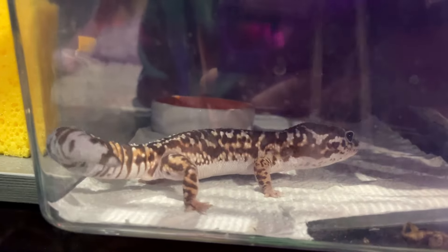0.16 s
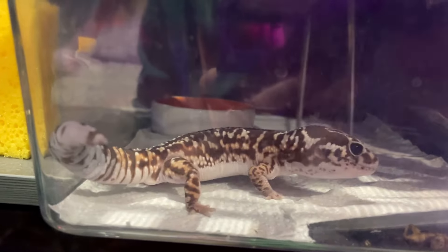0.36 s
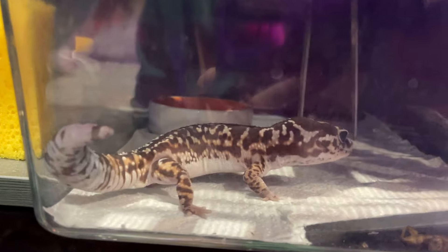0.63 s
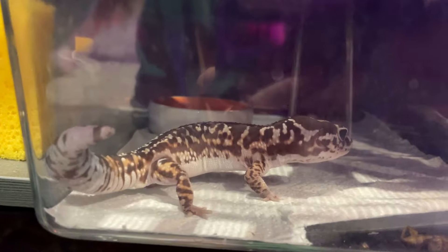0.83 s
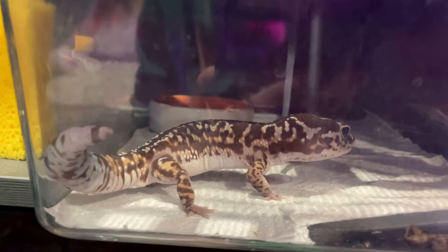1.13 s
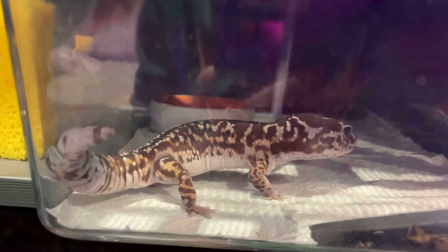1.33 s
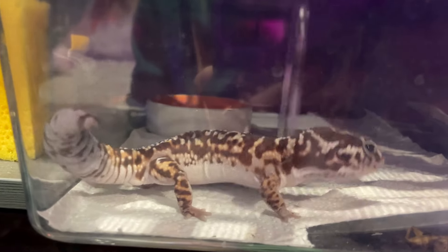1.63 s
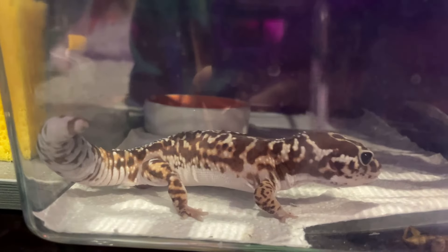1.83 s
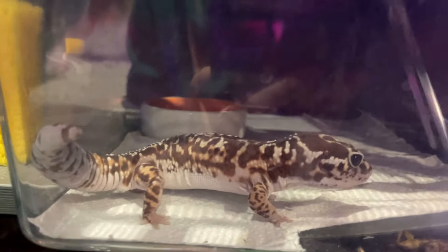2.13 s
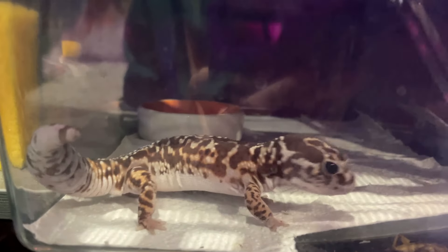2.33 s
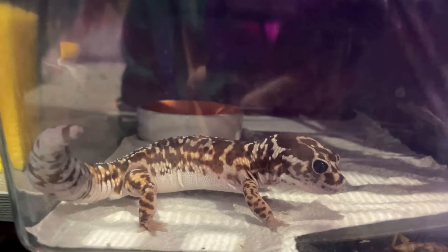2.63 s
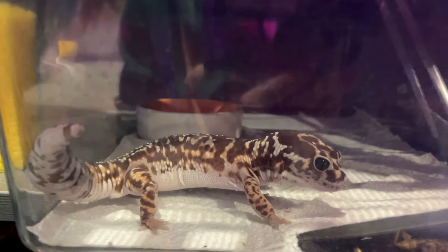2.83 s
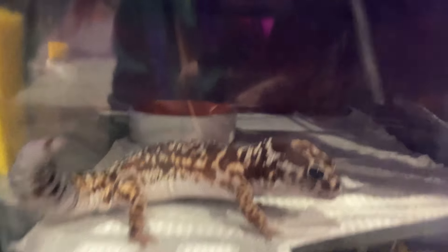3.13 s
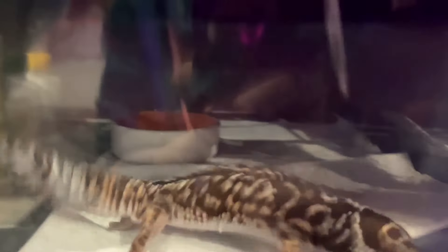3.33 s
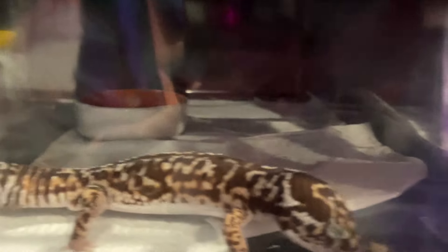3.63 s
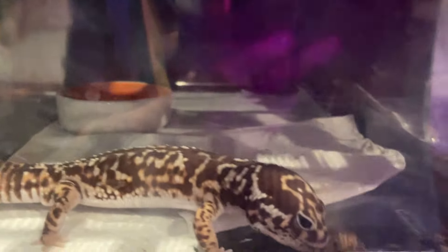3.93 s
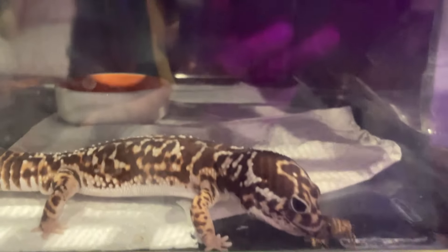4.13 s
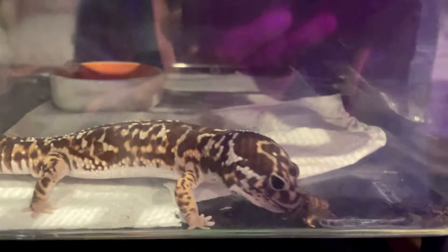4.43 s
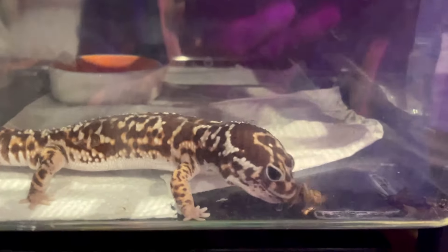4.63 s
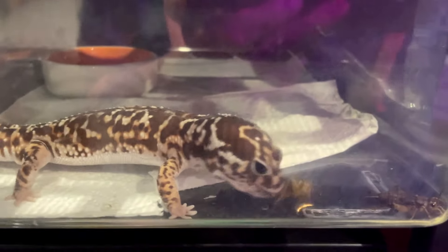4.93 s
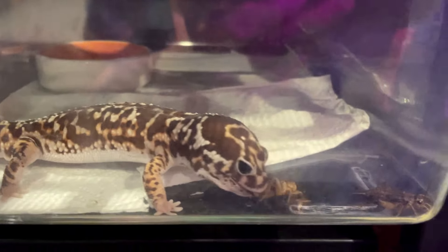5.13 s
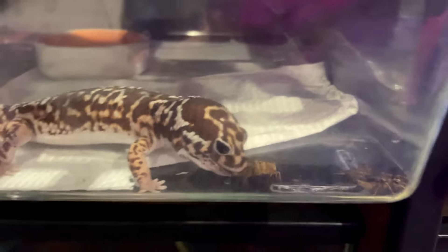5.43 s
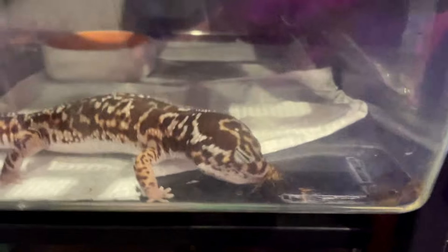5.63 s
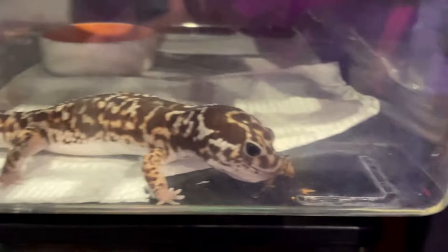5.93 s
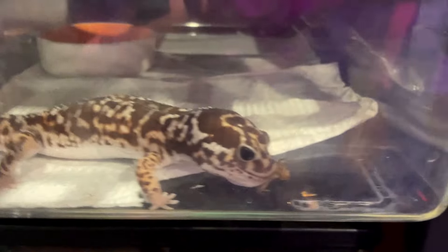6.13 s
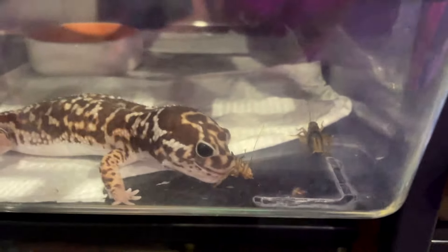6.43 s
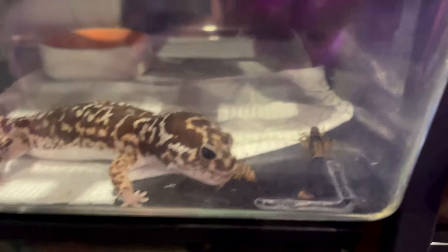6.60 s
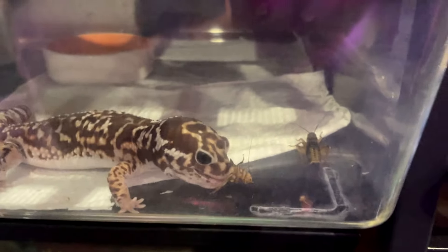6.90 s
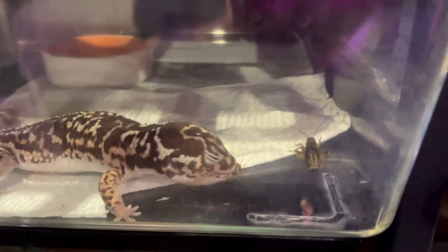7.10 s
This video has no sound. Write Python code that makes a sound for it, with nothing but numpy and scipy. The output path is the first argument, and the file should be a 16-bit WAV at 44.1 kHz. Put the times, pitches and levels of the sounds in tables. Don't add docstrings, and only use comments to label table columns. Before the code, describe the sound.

Handheld close stereo pickup of a lizard hunting insects in a small hard-walled tank. Isolated boxy knocks with short rings break a low rumble, faint hiss and thin motor whine. Faint leg flicks and paper rustles sit between them. The tank skids briefly, squeaks, and takes one very loud, slightly overloaded blow. Later a thump and dense crackling clicks follow, then it settles.

```python
import sys
import numpy as np
from scipy import signal
from scipy.fft import rfft, irfft, next_fast_len
from scipy.io import wavfile
from scipy.ndimage import uniform_filter1d

SR = 44100
rng = np.random.default_rng(int(sys.argv[2]) if len(sys.argv) > 2 else 0)


def voltage_ratio(level):
    return 10 ** (np.asarray(level, float) / 20)


def put_to_file(sound):
    columns = np.atleast_2d(sound).T
    safe = np.clip(columns, -1, 1)
    whole_steps = np.round(safe * 32767)
    wavfile.write(sys.argv[1], SR, whole_steps.astype(np.int16))


N = 320166

# f/Hz, level per Hz/dB
ROOM_SPECTRUM = [(30, -22), (55, 7), (90, -3), (150, -5), (250, -8), (400, -26), (700, -25), (1200, -34.5),
                 (2000, -35.5), (4000, -39), (7000, -48.5), (10000, -54.5), (13000, -42), (15000, -56)]
ROOM_DB = -50
# t/s, level/dB
RUMBLE_SWELL = [(0.0, -52), (3.28, -50), (7.26, -54)]
# f/Hz, width/Hz, level/dB
HUM_LINES = [(100, 9, -54), (199, 12, -63), (248, 10, -68), (484, 10, -79), (1084, 20, -72.5),
             (1165, 14, -82)]
# t/s, level/dB
WHINE_LEVEL = [(0, -6), (2.3, -4.5), (5.5, -.6)]
# f/Hz, likeness/1
ROOM_LIKENESS = [(60, 0.79), (130, 0.66), (290, 0.27), (640, .15), (3000, 0.083), (6000, .6), (8600, 0.97),
                 (15000, 0.59)]
# f/Hz, t60/s
ECHO_DECAY = [(100, 0.34), (500, 0.2), (2000, 0.13), (8000, 0.063)]

# f/Hz, level/dB
MIC_RESPONSE = [(15, -15.5), (40, 0), (60, 1.7), (5000, -1.93), (9000, 6.5), (11000, 5.5), (13000, 1.5),
                (14200, -3), (15800, -8.5), (16200, -39.5)]
# f/Hz, lead/rad
PORT_LEAD = [(0, 0), (1500, -.5), (2600, .8), (5000, .9), (6000, -1.3), (8600, -np.pi), (11300, -4.7),
             (12700, -6.1), (16000, -6.4)]
# f/Hz, level/dB
PORT_TILT = [(60, 3.5), (110, 2.5), (200, 3.5), (380, 2), (700, 4.5), (1290, 5.5), (2380, 4.5), (4400, 7),
             (8120, 3), (15000, -2)]
# f/Hz, level/dB
FAINTEST = [(3000, -125), (12000, -118), (13600, -104), (14800, -95), (16000, -82.5)]
SCATTER_DB, SCATTER_S = -4.5, .0008

# low f/Hz, high f/Hz
GRAIN_BANDS = [(165, 400), (400, 1700), (1700, 7900), (7900, 14600)]
REST_LEVELS = (-63.5, -74.5, -81.5, -87.5)
# t/s, rumble level/dB, rise/s, fall/s, drag over rumble/dB
SHOVES = [(0.0, -58, .1, 0.43, -6), (0.3, -40, 0.075, 0.15, -12.5), (0.92, -43, .2, 0.42, -29),
          (1.6, -46.5, 0.18, 0.23, -3.5), (1.8, -49.5, 0.37, 0.51, -10), (2.3, -43.5, 0.15, 0.24, -1),
          (3.1, -51, 0.55, 0.75, -15), (3.32, -36.5, 0.053, .1, -23), (3.39, -35, 0.11, 0.19, -8),
          (3.62, -36, 0.046, .09, -18.5), (3.72, -54.5, 0.44, 0.99, -14),
          (5.618, -30.5, 0.066, 0.089, -6.5), (6.13, -50, 0.69, 0.73, -6.5), (6.49, -52, .9, .3, -11.5),
          (7.26, -58, .7, .5, -9.5)]
# t/s, rustle level/dB, rise/s, fall/s, fizz over rustle/dB
SHUFFLES = [(0.0, -71.5, .1, 0.29, -3), (0.3, -68.5, 0.24, .9, -0.5), (0.89, -68.5, 0.79, 0.21, -3),
            (1.23, -74, 0.15, 0.13, 3), (1.6, -56, 0.14, 0.1, 2.5), (1.78, -68.5, .6, 0.36, 0),
            (2.31, -67, .15, 0.23, 6), (3.2, -63, 0.21, .3, -2), (3.385, -38, .035, .09, -3),
            (3.435, -41, .09, .04, 0), (3.54, -55.5, .5, .2, -4.5), (4.2, -74, 4.3, 3, 0),
            (5.491, -50.5, 0.019, 0.75, -8.5), (5.64, -43, 0.19, 0.15, -10), (5.76, -51.5, 0.44, 0.42, -8),
            (6.11, -47.5, 0.34, 0.52, -9.5), (6.52, -62.5, .9, 0.29, -3), (7.26, -72.5, 1.8, .5, 3)]
STROKE_DB = 20

# t/s, length/s, f/Hz, level/dB
WHISPERS = [(.328, .025, 4200, -67), (1.175, .065, 14900, -66), (1.19, .05, 12300, -69),
            (1.258, .055, 10750, -68), (1.36, .05, 10700, -70), (1.352, .055, 12300, -68),
            (1.522, .045, 10700, -68), (2.27, .08, 10600, -67), (2.305, .04, 3200, -64),
            (3.492, .025, 3700, -57), (3.535, .05, 6800, -62), (3.54, .045, 5000, -64),
            (3.54, .045, 3600, -66), (3.6, .06, 7000, -73)]
WHISPER_WIDTH_HZ = 650

# t/s, f/Hz, level/dB
SQUEAKS = [
    [(3.11, 333, -58), (3.15, 374.4, -55), (3.18, 385, -49), (3.21, 335.4, -55), (3.25, 313, -63)],
    [(3.225, 517, -56.5), (3.25, 554, -59.5), (3.28, 499.4, -63), (3.305, 496, -58.5)],
]
# t/s, level/dB
SCRAPE_LEVEL = [(3.02, -90), (3.08, -69), (3.199, -68), (3.3, -65), (3.37, -67.5), (3.4, -81)]
# f/Hz, width/Hz, level/dB
SCRAPE_MODES = [(3850, 300, -3), (4280, 240, 0), (4700, 250, -5), (10600, 600, -6), (1950, 150, -9)]
# t/s, level/dB
SKID_LEVEL = [(2.235, -46), (2.26, -36), (2.33, -36), (2.385, -41), (2.414, -37), (2.5, -55)]
SKID_HZ, SKID_WIDTH_HZ = 260, 200

# low f/Hz, high f/Hz
SNAP_BANDS = [(.6, 1.5), (700, 2400), (7500, 16000)]
SHARP_RISE, SOFT_RISE = .065, .6
# t/s, level/dB, t60/s, fizz over tap/dB
TAPS = [
    (0.2693, -39.5, .06, -26),
    (0.8717, -20, 0.032, -9),
    (2.2117, -30.5, 0.093, -28),
    (2.3294, -55, .047, -9),
    (2.7637, -49, 0.047, -16.5),
    (3.3793, -10, 0.048, -32),
    (3.5985, -34, 0.033, -27),
    (3.984, -42, 0.096, -8.5),
    (4.3782, -42, 0.02, -25),
    (7.195, -57, 0.079, -.5),
]
TAP_CRISP_DB, TAP_HZ = -21, 2950
# t/s, level/dB, t60/s
FLICKS = [(0.33, -48, 0.08), (0.701, -49, 0.048), (1.195, -56, .13), (1.265, -58, 0.11), (1.353, -56, 0.13),
          (1.49, -55, .1), (1.525, -52, .1), (1.72, -51, .06), (2.035, -51.5, 0.2), (2.21, -53, .1),
          (2.4, -55, .1), (5.258, -56.5, 0.052), (7.128, -51, 0.09)]
FLICK_CRISP_DB, FLICK_DULL_DB, FLICK_HZ = -13, -21.5, 3840
# t/s, level/dB, t60/s, f/Hz, dull over crisp/dB
CRACKS = [(0.5906, -60.5, 0.1, 3960, 6.5), (1.172, -46, 0.1, 3300, -4.5), (1.428, -56, .07, 3050, -21),
          (1.611, -41.5, 0.068, 3170, 0), (3.422, -27.5, .06, 3610, -25), (3.4994, -40, 0.028, 4030, -15.5),
          (4.0026, -42.5, 0.047, 2790, -11.5), (5.9602, -37, 0.064, 5340, -9.5),
          (6.0253, -20.5, .036, 2950, -8), (6.2557, -20.5, 0.034, 3500, -3), (6.3199, -42, .05, 2000, 2),
          (1.478, -58, .03, 4000, -12), ]
CRACK_FIZZ_DB = -14
# t/s, level/dB, t60/s, f/Hz, dull part/dB
CRUNCHES = [(4.707, -46, .022, 7500, -30), (5.9412, -44, .02, 4400, -12), (2.418, -50.5, 0.051, 3100, -3),
            (5.472, -36.5, 0.022, 4450, -17.5), (5.5956, -27, 0.055, 3130, -12),
            (5.888, -28, 0.02, 5240, -14), (5.9926, -38.5, 0.071, 6130, -16.5),
            (6.014, -22.5, 0.036, 4500, -8), (6.083, -22, 0.019, 3050, -9), (6.2324, -37, 0.077, 6700, -18),
            (6.2615, -22, 0.027, 3730, -4), (6.3327, -36, 0.03, 3500, 2), (6.385, -40, 0.019, 3670, -21)]
CRUNCH_CRISP_DB = -5
# t/s, level/dB, t60/s, f/Hz, dull part/dB
CRUMPLES = [
    (1.555, -41, .16, 4360, -5),
    (5.577, -38, .08, 3300, -12),
    (5.632, -38, .06, 4500, -14),
    (5.767, -39, .04, 5400, -30),
    (5.805, -31, .05, 6340, -23),
    (6.006, -36, .06, 4000, -8),
    (3.535, -52, .12, 4500, -8),
    (3.31, -56, .1, 2200, 8),
]
# t/s, level/dB, contact/s
TICKS = [
    (4.379, -40, 0.00045),
    (5.889, -28, 0.000073),
    (6.036, -23, 0.00012),
    (6.0835, -15, 0.0001),
]

# t/s, f/Hz, level/dB, t60/s
RINGS = [(1.432, 3070, -61, 0.06), (2.213, 3150, -36.5, 0.029), (2.214, 3700, -40, .025),
         (4.379, 3100, -58, .02), (2.214, 4470, -49, 0.021), (2.219, 718, -23, 0.07),
         (2.2195, 212, -2.5, 0.1), (.27, 1900, -42, .035), (.27, 3000, -47, .02), (.272, 400, -24, .05),
         (.997, 900, -43, .04), (3.3805, 290, -1, .045), (3.381, 511, -17, .08), (3.599, 720, -30, .08),
         (3.602, 480, -30, .08), (3.38, 3450, -20, .03), (3.38, 2050, -22, .025), (3.389, 1900, -24, .03),
         (5.592, 270, -9, .055), (5.593, 510, -22, .06), (.274, 511, -30, .12), (3.614, 146, -22, 0.35),
         (3.6, 2900, -48, .04), (0.95, 142, -29, .35), (3.986, 3305, -54, 0.056), (4.379, 1400, -50, 0.02),
         (3.985, 1373, -42, 0.033), (4.003, 3500, -57.5, 0.064), (6.026, 1914, -31, 0.11),
         (6.028, 1745, -30, 0.04), (6.086, 1037, -43, .06), (6.266, 146, -36.5, 0.17),
         (6.263, 514, -38, 0.088)]
# t/s, f/Hz, level/dB, t60/s
HOPS = [
    (2.2465, 225, -16, .1),
    (2.264, 235, -15, .07),
    (2.283, 190, -19, .1),
    (2.298, 225, -16, .12),
    (2.323, 200, -20, .08),
    (2.262, 590, -34, .06),
    (2.325, 680, -39, .06),
    (2.36, 165, -24, .2),
    (2.405, 210, -13, .08),
    (2.445, 150, -30, .15),
]
RING_RISE = 1.2
# t/s, force level/dB, share into shelf/dB, share into pane/dB, ring time/1
KNOCKS = [(0.269, -22, -1, -12.5, 1.31), (0.57, -46.5, -12, -8, 0.69), (0.874, -6.5, -7.5, -15.5, 0.71),
          (0.945, -29.5, 6, -9.5, 0.89), (1.627, -35, -6, -16.5, 1.13), (2.212, -23, -6, -8, .8),
          (2.327, -42, -3, -2, 0.93), (2.398, -35, 2, -9, 0.69), (2.685, -56, -9, -3, 1.3),
          (2.975, -31.5, -3, -10, 0.83), (3.31, -26, 2, -11, 0.92), (3.379, -9, 2, 0, 0.73),
          (3.433, -33, 17.5, -13.5, 0.85), (3.597, -33, -3, 1, 1.09), (3.848, -45, 6, -10.5, 0.88),
          (5.591, -18, 4, -10.5, 0.75), (6.32, -43.5, -12, 2, 1.03)]
# f/Hz, level/dB, t60/s
TANK_PARTS = [
    [(98.2, -8.5, 0.34), (139.24, 4.5, 0.24)],
    [(185.2, -4.5, 0.26), (218, 2, 0.14), (258, -6.5, 0.22), (307, -.6, 0.12), (355.6, -7.5, .14)],
    [(465, 2.5, 0.098), (515, 0.6, 0.15), (629.5, -7, 0.16), (720, 7.5, 0.06), (881, -20, 0.27),
     (950, -9, 0.18), (1125, -8, 0.15), (1258.6, -17, 0.13)],
    [(1477, -7, 0.09), (1750, 2.5, 0.037), (1906, 3, .12), (2040, -3.5, 0.065), (2100, -12, .1),
     (2920, -10, 0.062), (2915, -5, 0.08), (3290, -9.5, 0.11), (3850, -12.5, .06)],
]
HARD_DB, EDGE_DB, EDGE_LOSS = -9, -9, .4


def evened(x):
    return x / np.sqrt(np.mean(x ** 2) + 1e-20)


def read(points, hz):
    f, value = np.transpose(points)
    return np.interp(np.log(hz + 1), np.log(f + 1), value)


def band(x, low_hz, high_hz):
    sos = signal.butter(N=3, Wn=[low_hz, high_hz], btype="band", fs=SR, output="sos")
    return evened(signal.sosfilt(sos, x))


def add(mix, s, sound):
    part = mix[round(s * SR):][:len(sound)]
    part += sound[:len(part)]


def resonate(x, hz, width):
    turn = np.exp(2j * np.pi * hz * np.arange(len(x)) / SR)
    r = np.exp(-np.pi * width / SR)
    low = signal.lfilter([1 - r], [1, -r], x / turn + 1e-18)
    low = signal.lfilter([1 - r], [1, -r], low)
    return 2 * (turn * low).real


def grains(count, per_s, spread_db):
    size = voltage_ratio(spread_db * np.minimum(rng.exponential(1, count), 5))
    return size * rng.standard_normal(count) * (rng.random(count) < per_s / SR)


def room_air():
    frames, hz = N // 512 + 5, np.fft.rfftfreq(2048, 1 / SR)
    a, b, c, d, patches = rng.standard_normal((frames, 1025, 5)).T
    patches = uniform_filter1d(patches, size=20, axis=0)
    patches = evened(uniform_filter1d(patches, size=8, axis=1))
    s, swell_db = np.transpose(RUMBLE_SWELL)
    swell_db = np.interp(np.arange(frames) * 512 / SR, s, swell_db - swell_db.mean())
    same = np.clip(read(ROOM_LIKENESS, hz), -1, 1)[:, None]
    left = a + 1j * b
    right = same * left + np.sqrt(1 - same ** 2) * (c + 1j * d)
    z = np.array([left, right])
    z *= voltage_ratio(read(ROOM_SPECTRUM, hz)[:, None] + swell_db / (1 + (hz[:, None] / 300) ** 2))
    z *= voltage_ratio(1.6 * patches)
    return voltage_ratio(ROOM_DB) * evened(signal.istft(z, nperseg=2048, noverlap=1536)[1][:, :N])


def motor():
    size = next_fast_len(N)
    hz = np.fft.rfftfreq(size, 1 / SR)
    lines = sum(voltage_ratio(db) / np.sqrt(width) / (1 + (2 * (hz - f) / width) ** 2) for f, width, db in HUM_LINES)
    high = hz > 800
    one, other = rfft(rng.standard_normal((2, size)))
    like = np.clip(read(ROOM_LIKENESS, hz) + 0.12, 0, 1)
    pair = np.array([one, like * one + np.sqrt(1 - like ** 2) * other])
    split = pair * lines * [[~high], [high]]
    hum, whine = np.sqrt(2 * SR / np.pi) * irfft(split, size)[..., :N]
    return hum + whine * voltage_ratio(np.interp(np.arange(N) / SR, *np.transpose(WHINE_LEVEL)))


def echo(x):
    taps = np.zeros((2, SR // 2))
    at = np.arange(120, SR // 2 - 20, 20)
    at = at + rng.integers(0, 20, (2, len(at)))
    np.put_along_axis(taps, at, rng.choice([-1., 1.], at.shape), 1)
    hz, t, z = signal.stft(taps, SR, nperseg=256)
    z *= (hz / (hz + 700))[:, None]
    fall = voltage_ratio(-60 * t / read(ECHO_DECAY, hz)[:, None])
    tail = signal.istft(z * fall, SR, nperseg=256)[1]
    tail[1] = .45 * tail[0] + 1.1 * tail[1]
    return signal.fftconvolve(x[None], tail / np.linalg.norm(tail[0]), axes=1)[:, :N]


def strokes(rows):
    s, db, rise, fall, other_db = np.transpose(rows)[:, :, None]
    t = np.arange(0, N + 64, 64) / SR - s
    slope = db - STROKE_DB * np.maximum(-t / np.maximum(rise, .01), t / np.maximum(fall, .01))
    return slope.max(0), (slope + other_db).max(0)


def paper():
    levels = [np.repeat(np.maximum(db, rest), 64)[:N]
              for db, rest in zip(strokes(SHOVES) + strokes(SHUFFLES), REST_LEVELS)]
    drift = uniform_filter1d(uniform_filter1d(rng.standard_normal(N), 400), 400)
    clumps = voltage_ratio(2.3 * evened(drift))
    return sum(voltage_ratio(db + shift_db) * band(clumps * grains(N, 9000, 1.2), *edge)
               for db, edge, shift_db in zip(levels, GRAIN_BANDS, (-5.0, -6.5, -6.5, -1.5)))


def whisper(length, hz, db, noise):
    count = round(length * SR)
    return voltage_ratio(db) * np.hanning(count) * evened(resonate(noise, hz, WHISPER_WIDTH_HZ))[-count:]


def squeak(rows):
    s, hz, db = np.transpose(rows)
    t = np.arange(s[0], s[-1], 1 / SR)
    waver = 1 + 0.017 * evened(uniform_filter1d(rng.standard_normal(len(t)), 200))
    turns = 2 * np.pi * np.cumsum(np.interp(t, s, hz) * waver) / SR
    tone = np.sin(turns) + voltage_ratio(-16) * np.sin(2 * turns) + voltage_ratio(-25.5) * np.sin(3 * turns)
    return s[0], voltage_ratio(np.interp(t, s, db) + 6) * tone * signal.windows.tukey(len(t), .3)


def scrape():
    s, level_db = np.transpose(SCRAPE_LEVEL)
    t = np.arange(s[0], s[-1], 1 / SR)
    rub = grains(len(t), 8000, 2.2)
    rung = sum(voltage_ratio(db) * evened(resonate(rub, hz, width)) for hz, width, db in SCRAPE_MODES)
    return s[0], voltage_ratio(np.interp(t, s, level_db)) * evened(rung)


def skid():
    s, db = np.transpose(SKID_LEVEL)
    t = np.arange(s[0], s[-1], 1 / SR)
    slips = grains(len(t), 3000, 3.0)
    return s[0], voltage_ratio(np.interp(t, s, db)) * evened(resonate(slips, SKID_HZ, SKID_WIDTH_HZ))


def snap(levels_db, t60, hz, rise):
    t, out = np.arange(SR // 6) / SR, 0
    edges = [np.multiply(SNAP_BANDS[0], hz), *SNAP_BANDS[1:]]
    for db, edge, life in zip(levels_db, edges, (1.01, 1.4, .8)):
        shape = (1 - np.exp(-t / (rise * t60))) * voltage_ratio(-60 * t / (t60 * life))
        out = out + voltage_ratio(db - 11.5) * shape / shape.max() * band(grains(len(t), 12000, 1.7), *edge)
    return out


def small_contacts():
    found = []
    for s, db, t60, fizz in TAPS:
        found.append((s, (db + TAP_CRISP_DB, db, db + fizz), t60, TAP_HZ, SHARP_RISE))
    for s, db, t60 in FLICKS:
        found.append((s, (db + FLICK_CRISP_DB, db + FLICK_DULL_DB, db), t60, FLICK_HZ, SOFT_RISE))
    for s, db, t60, hz, dull in CRACKS:
        found.append((s, (db, db + dull, db + CRACK_FIZZ_DB), t60, hz, SHARP_RISE))
    for rows, rise in ((CRUNCHES, SHARP_RISE), (CRUMPLES, SOFT_RISE)):
        for s, db, t60, hz, dull in rows:
            found.append((s, (db + CRUNCH_CRISP_DB, db + dull, db), t60, hz, rise))
    return sorted(found)


def tick(db, contact):
    t = np.arange(SR // 4) / SR
    return voltage_ratio(db) * (1 - t / contact) * np.exp(-t / contact)


def ring(hz, db, t60):
    t = np.arange(SR // 4) / SR
    return voltage_ratio(db - 60 * t / t60) * np.sin(2 * np.pi * hz * t) * (1 - np.exp(-t * hz / RING_RISE))


def knock(levels_db, damping, chance, chatter):
    t, out, k = np.arange(len(chatter)) / SR, 0, 0
    for level_db, modes, loose in zip(levels_db, TANK_PARTS, (.04, .15, .6, 1.8)):
        part = 0
        for hz, db, t60 in modes:
            u = np.maximum(t - 0.1032 / np.sqrt(hz) + 0.00201, 0)
            start = 1 - np.exp(-u * hz * .5)
            life = t60 * damping
            fall = voltage_ratio(-60 * u / life) + 3.4 * voltage_ratio(-60 * u / (0.29 * life))
            spot_db, detune, phase = chance[k]
            turns = hz * (1 + 0.033 * (detune - .5)) * u + phase
            part = part + voltage_ratio(db + 4.4 * (spot_db - .5)) * np.sin(2 * np.pi * turns) * start * fall
            k += 1
        bed = band(chatter, 0.55 * modes[0][0], 1.2 * hz) * fall * (1 - np.exp(-t * hz * 0.16))
        out = out + voltage_ratio(level_db - 5) * (part + loose * bed) / np.hypot(1, loose)
    contact = 0.00068 * voltage_ratio(-.45 * (levels_db[2] + 8.5))
    return out * (1 - np.exp(-t / contact))


def ports(left, right):
    size = next_fast_len(N + 4096)
    hz = np.fft.rfftfreq(size, 1 / SR)
    f, lead = np.transpose(PORT_LEAD)
    half = voltage_ratio(read(PORT_TILT, hz) / 2)
    late = np.exp(-1j * np.interp(hz, f, lead))
    pair = np.array([rfft(left, size) * half, rfft(right, size) / half * late])
    return irfft(pair * voltage_ratio(read(MIC_RESPONSE, hz)), size)[:, :N]


def scene():
    near, small = paper(), np.zeros(N)
    behind = room_air() + motor()
    for (s, *how), noise in zip(WHISPERS, rng.standard_normal((len(WHISPERS), SR // 8))):
        add(small, s, whisper(*how, noise))
    for rows in SQUEAKS:
        add(near, *squeak(rows))
    add(near, *scrape())
    add(near, *skid())
    for s, *how in small_contacts():
        add(small, s, snap(*how))
    for s, *how in TICKS:
        add(near, s, tick(*how))
    for s, *how in RINGS + HOPS:
        add(near, s, ring(*how))
    for s, db, shelf, pane, damping in KNOCKS:
        edge_db = db + pane + EDGE_DB - EDGE_LOSS * (HARD_DB - db - pane)
        levels_db = [db + shelf, db, db + pane, edge_db]
        add(near, s, knock(levels_db, damping, rng.random((30, 3)), grains(SR // 3, 6200, 1.2)))
    left, right = near + small + voltage_ratio(-5) * echo(near + small) + behind
    scatter = rng.standard_normal(200) * np.exp(-np.arange(200) / SR / SCATTER_S)
    scatter = voltage_ratio(SCATTER_DB) * scatter / np.linalg.norm(scatter)
    right = right + signal.oaconvolve(small, scatter)[:N]
    return ports(left, right)


def band_limit(x):
    return signal.sosfilt(signal.butter(12, 16140, fs=SR, output="sos"), x)


def record(dry):
    left, right = np.clip(dry, -1, 1)
    hz, _, z = signal.stft([left + right, left - right], SR, nperseg=1024, noverlap=768)
    power = abs(z) ** 2
    near = uniform_filter1d(uniform_filter1d(power, size=9, axis=1), size=4, axis=2)
    masker = uniform_filter1d(near.sum(0), size=61, axis=0)
    masked = masker * voltage_ratio(2 * -13) * (1 + 4 / (1 + ((hz[:, None] - 8600) / 330) ** 4))
    limit = masked + voltage_ratio(2 * read(FAINTEST, hz))[:, None]
    kept = (near > limit) | (hz < 3000)[:, None]
    mid, side = signal.istft(z * kept, SR, nperseg=1024, noverlap=768)[1][:, :N]
    return band_limit(np.array([mid + side, mid - side]) / 2)


dry = scene()
out = record(dry)
put_to_file(out)
```